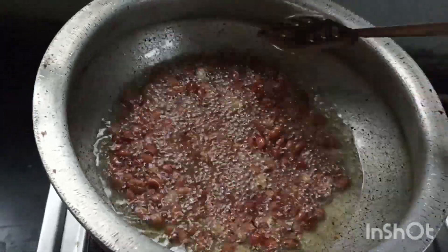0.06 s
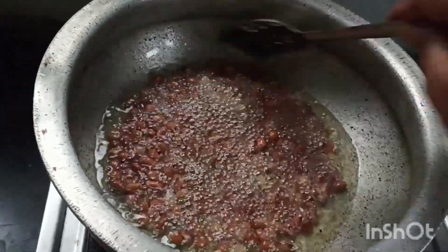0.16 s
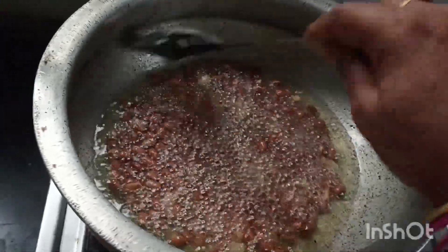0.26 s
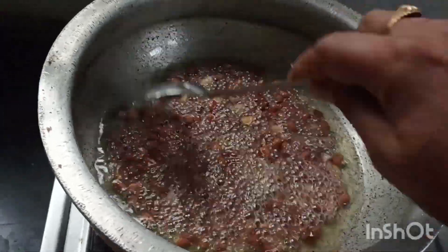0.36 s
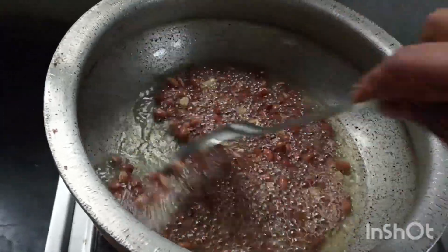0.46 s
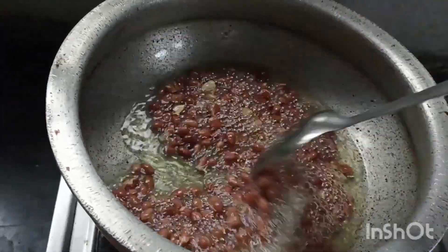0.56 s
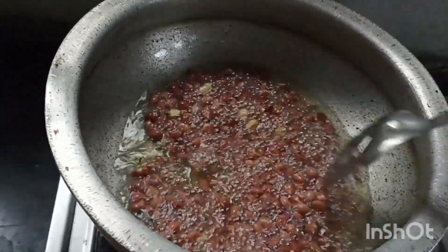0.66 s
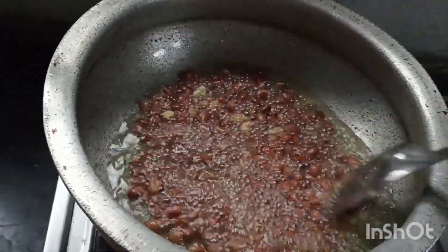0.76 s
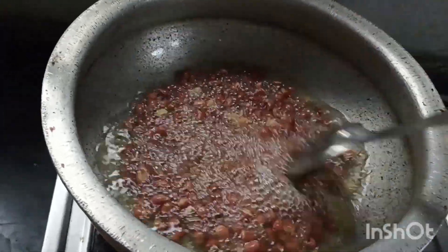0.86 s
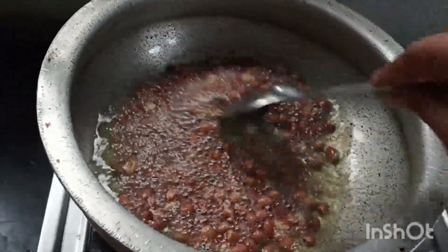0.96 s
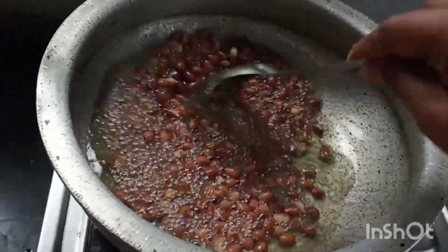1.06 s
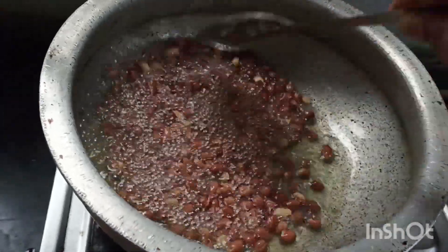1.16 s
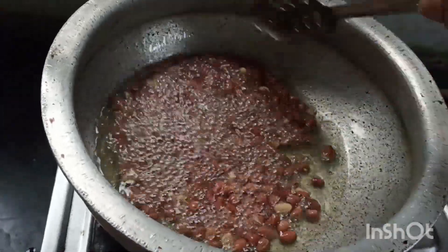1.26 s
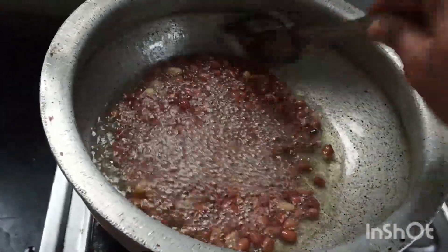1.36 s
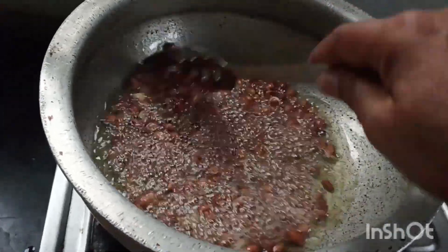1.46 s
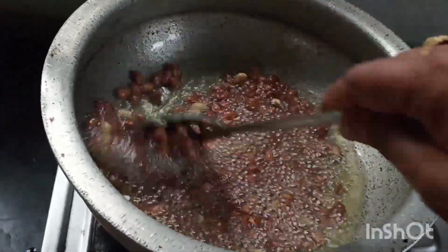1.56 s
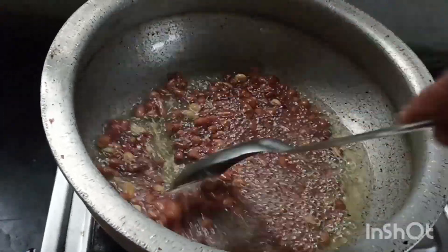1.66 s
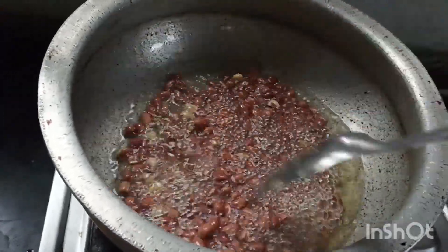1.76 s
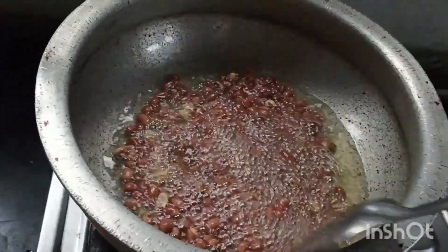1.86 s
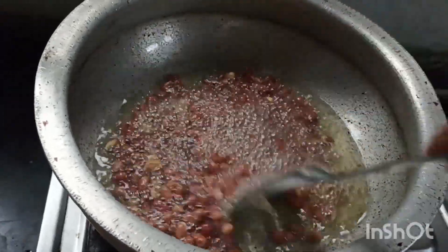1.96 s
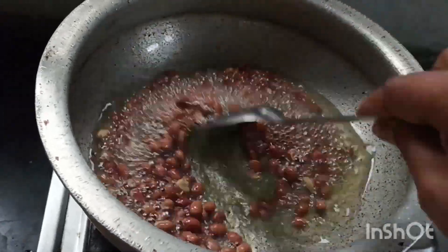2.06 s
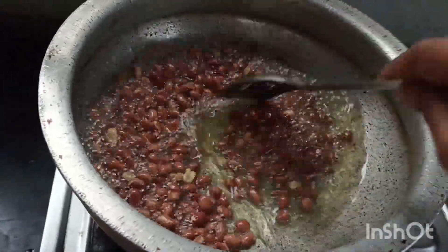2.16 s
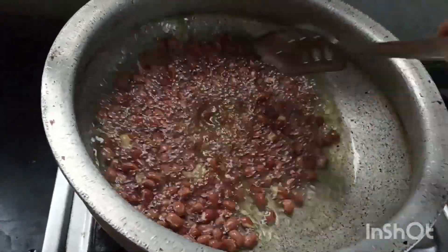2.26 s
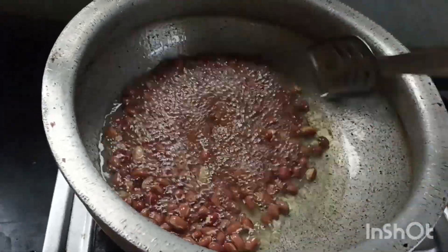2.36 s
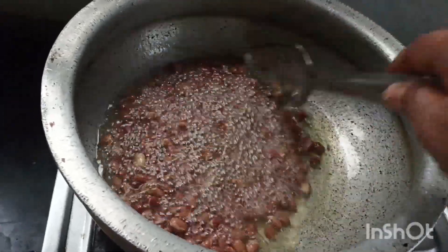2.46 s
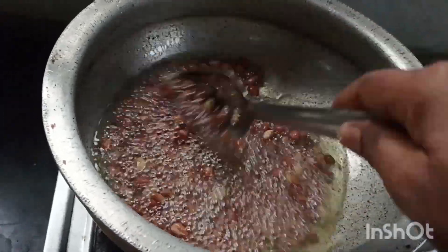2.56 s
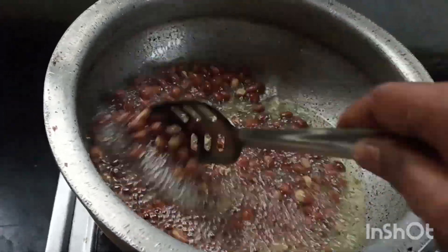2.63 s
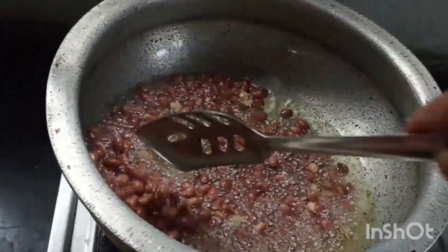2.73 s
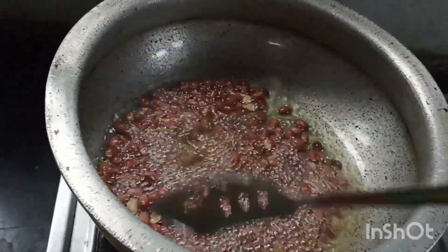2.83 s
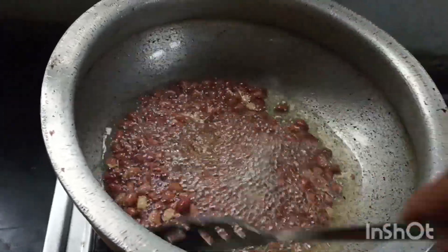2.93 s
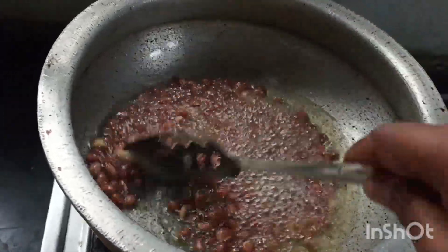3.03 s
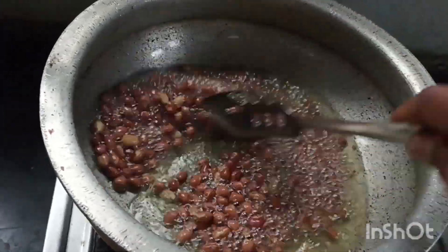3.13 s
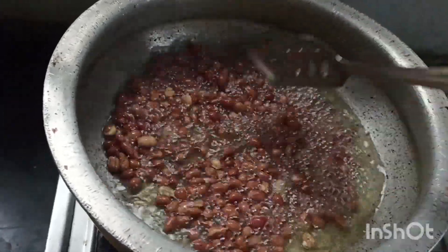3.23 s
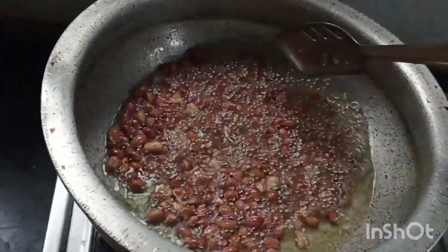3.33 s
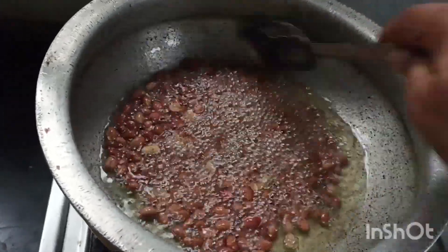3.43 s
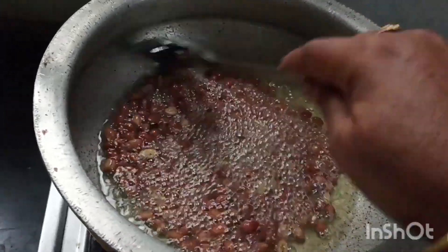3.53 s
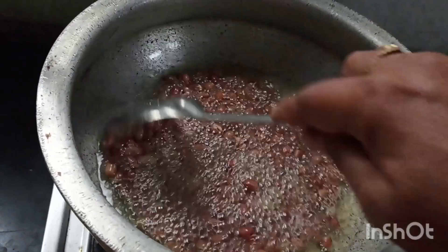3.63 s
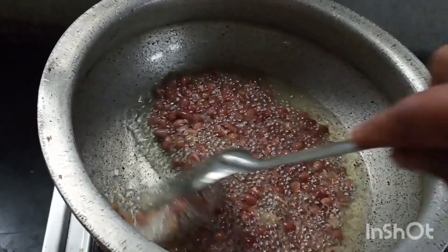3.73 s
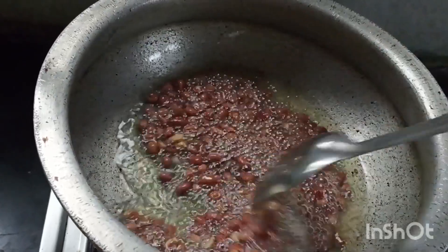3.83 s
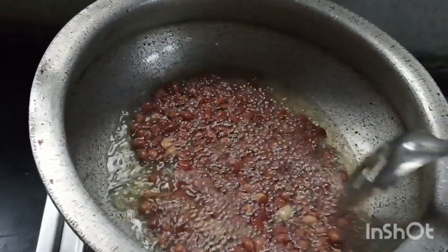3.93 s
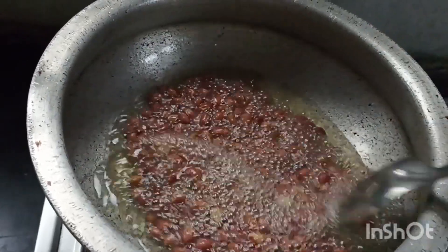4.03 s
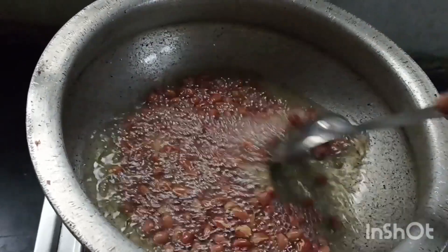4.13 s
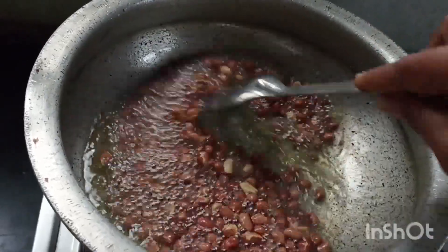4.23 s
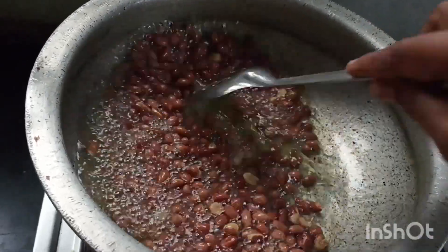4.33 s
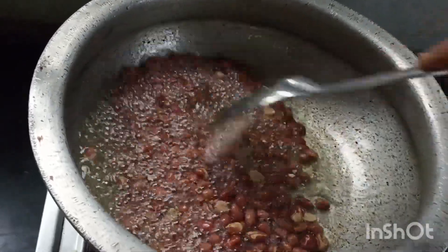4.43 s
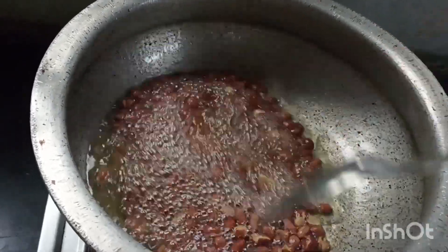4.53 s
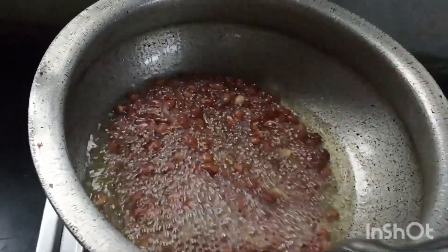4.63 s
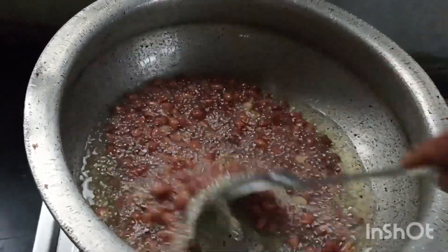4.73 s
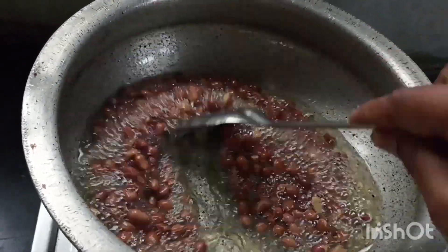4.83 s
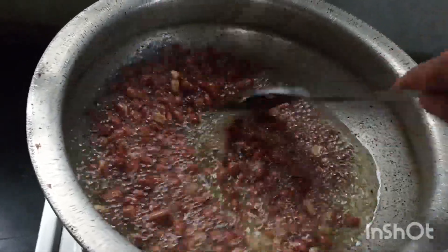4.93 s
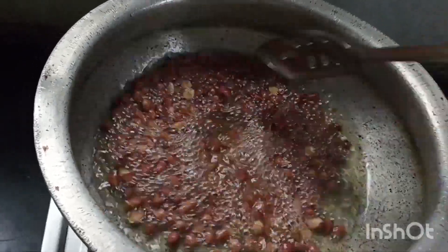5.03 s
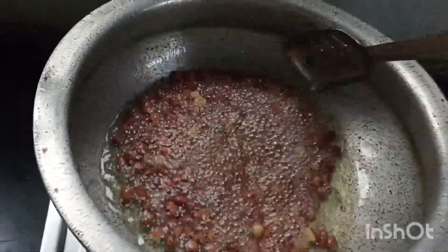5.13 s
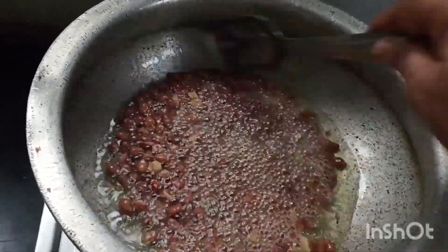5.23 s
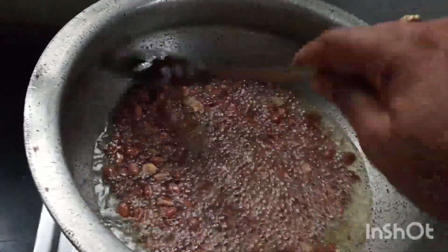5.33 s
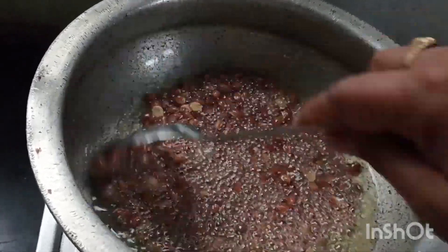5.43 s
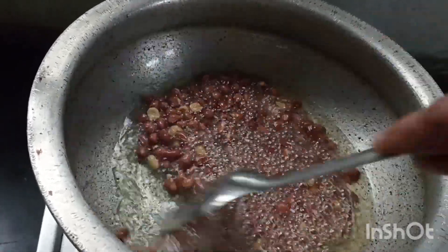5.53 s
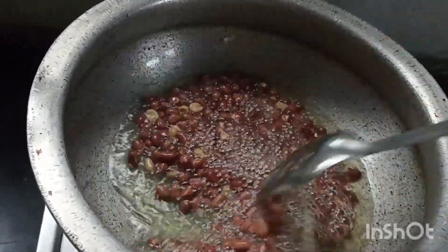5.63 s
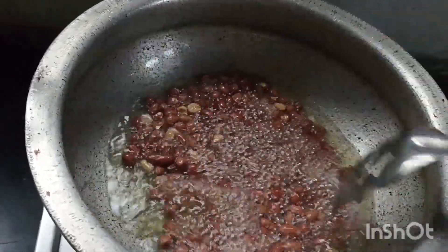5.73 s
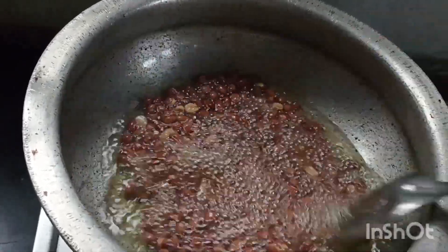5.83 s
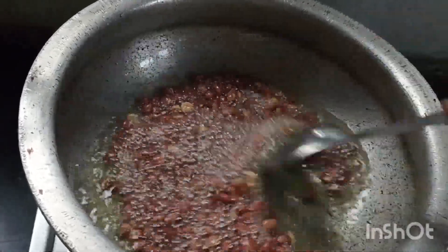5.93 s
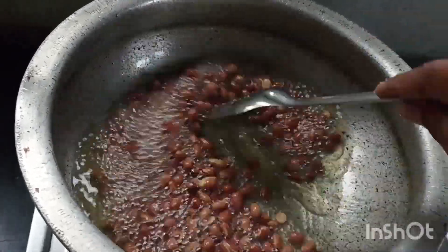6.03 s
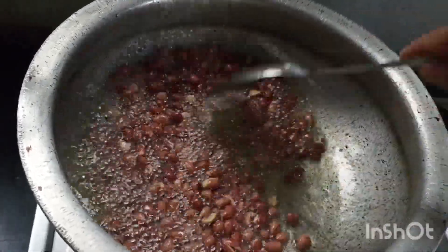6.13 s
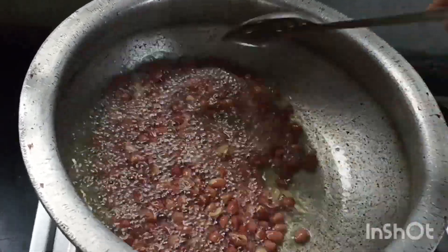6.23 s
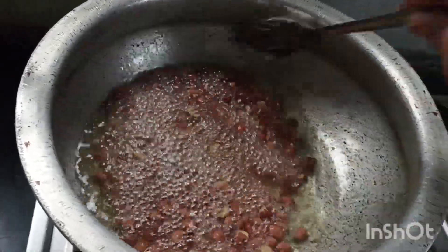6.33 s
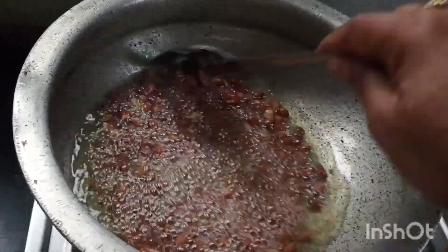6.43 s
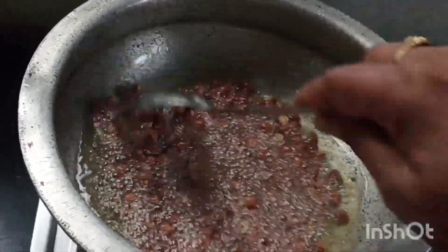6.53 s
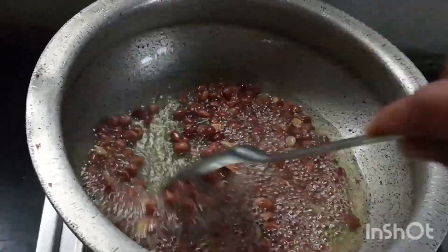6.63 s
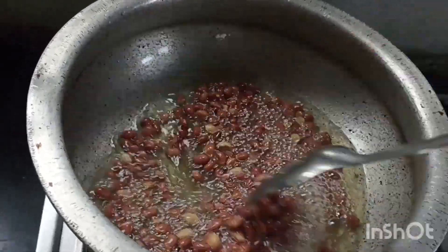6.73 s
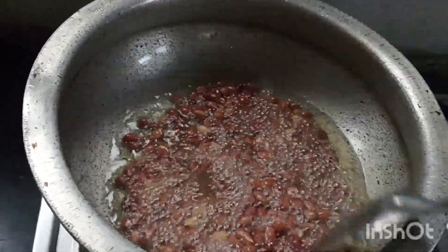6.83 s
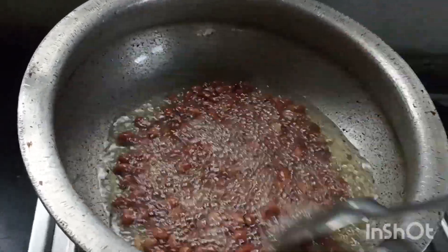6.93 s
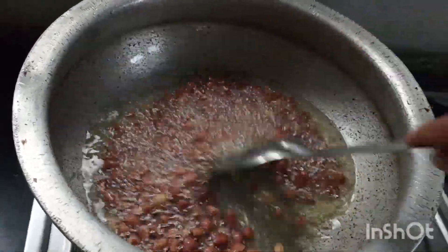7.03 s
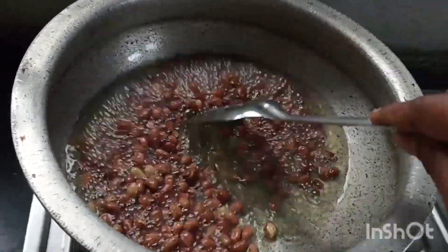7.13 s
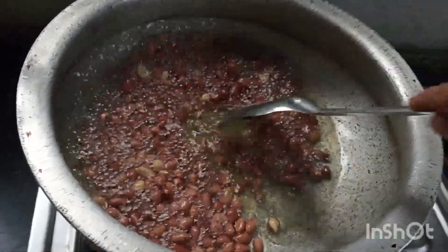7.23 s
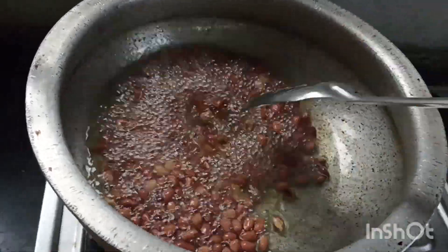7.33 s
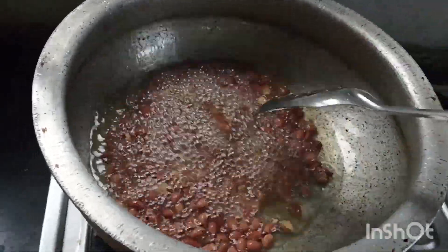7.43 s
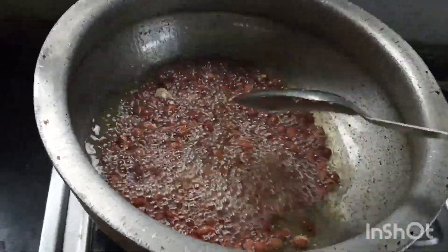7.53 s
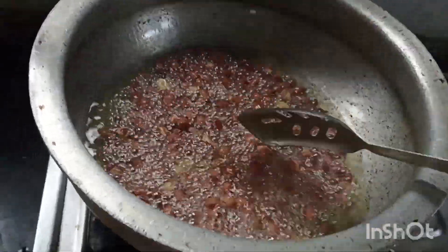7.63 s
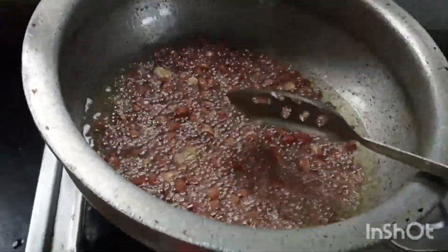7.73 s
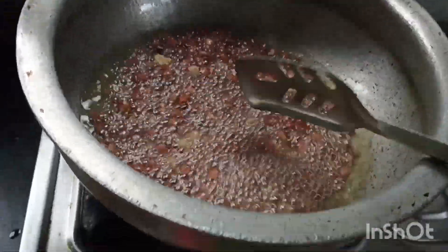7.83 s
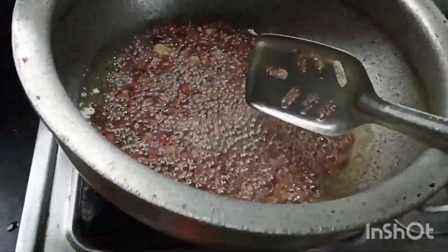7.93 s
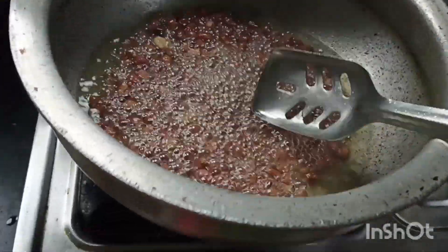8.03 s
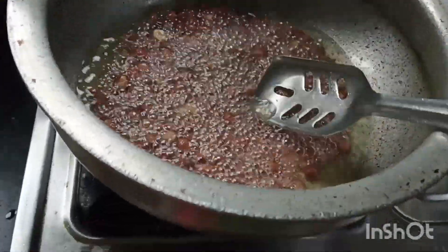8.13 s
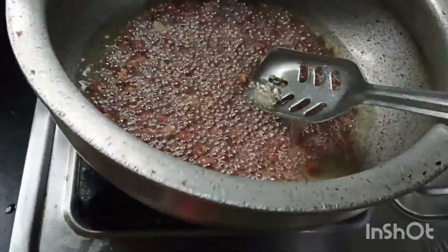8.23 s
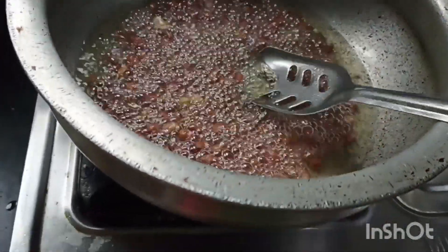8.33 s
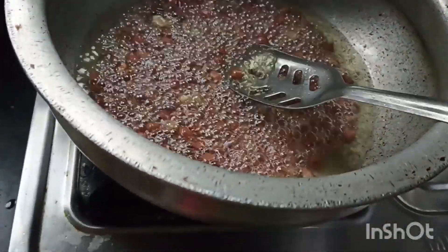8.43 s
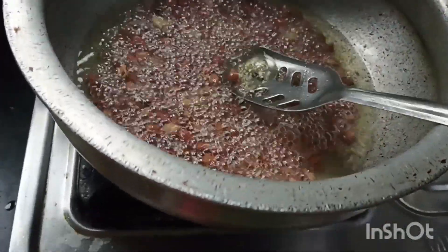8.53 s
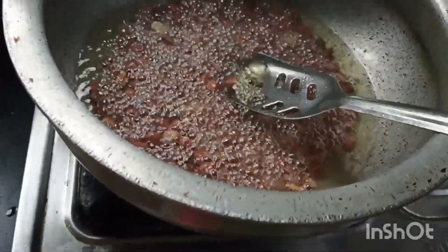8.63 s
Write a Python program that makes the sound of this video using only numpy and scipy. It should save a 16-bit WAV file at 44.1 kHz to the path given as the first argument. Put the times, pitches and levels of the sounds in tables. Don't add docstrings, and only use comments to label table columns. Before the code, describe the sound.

Nuts sizzle and hiss steadily in hot oil while a steel spatula lands, scrapes the metal pan and shoves them in clattering strokes.

```python
import sys
import numpy as np
from scipy import signal
from scipy.fft import rfft, irfft, next_fast_len
from scipy.io import wavfile

SR = 44100
rng = np.random.default_rng(int(sys.argv[2]) if len(sys.argv) > 2 else 0)


def level_to_linear(level):
    exponent = np.asarray(level, float) / 20
    return 10 ** exponent


def int16_out(signal):
    q = np.round(np.clip(np.atleast_2d(signal).T, -1, 1) * 32767)
    wavfile.write(sys.argv[1], SR, q.astype(np.int16))


N = 383213


def unit(x):
    return x / np.sqrt(np.mean(x ** 2) + 1e-20)


def place(out, start_s, sound):
    i = int(start_s * SR)
    out[:, i:i + sound.shape[1]] += sound[:, :N - i]


def at_hz(points, hz):
    point_hz, point_db = np.transpose(points)
    return np.interp(np.log(hz + 1), np.log(point_hz), point_db)


def colour(x, spectrum):
    size = next_fast_len(N)
    gain = level_to_linear(at_hz(spectrum, np.fft.rfftfreq(size, 1 / SR)))
    return unit(irfft(rfft(x, size) * gain, size)[..., :N])


def drift(rate_hz):
    r = np.exp(-2 * np.pi * rate_hz * 40 / SR)
    slow = signal.lfilter([1], [1, -2 * r, r * r], rng.standard_normal(N // 40 + 2002))
    slow = slow[2000:]
    return np.interp(np.arange(N) / 40, np.arange(len(slow)), unit(slow))


def grains(per_s, spread_db):
    sizes = level_to_linear(spread_db * np.minimum(rng.exponential(1, (2, N)), 5))
    signs = rng.choice([-1, 1], (2, N))
    return sizes * signs * (rng.random((2, N)) < per_s / SR)


def ring(clicks, hz, t60):
    r = level_to_linear(-60 / (t60 * SR))
    w = 2 * np.pi * min(hz, .45 * SR) / SR
    return signal.lfilter([0, np.sin(w)], [1, -2 * r * np.cos(w), r * r], clicks + 1e-18)


def body(clicks, modes, wander_db):
    out = 0
    for k, (hz, db, t60) in enumerate(modes):
        wandering = clicks * level_to_linear(wander_db * drift(19.0))
        out = out + (-1) ** k * level_to_linear(db) / np.sqrt(t60) * ring(wandering, hz, t60)
    return unit(out)


def strike(times, levels_db, modes, scatter_db, damp):
    out = np.zeros((2, N))
    at = (np.array(times) * SR).astype(int)
    luck = rng.standard_normal((len(at), len(modes), 2))
    for k, (hz, db, t60) in enumerate(modes):
        clicks = np.zeros((2, N))
        clicks[:, at] = level_to_linear(levels_db + db + scatter_db * luck[:, k].T)
        out += ring(clicks, hz, t60 * damp)
    return out


def puffs(times, levels_db, decay_s, low_hz, high_hz):
    out = np.zeros((2, N))
    t = np.arange(int(.1 * SR)) / SR
    noise = rng.standard_normal((len(times), 2, len(t))) * np.exp(-t / decay_s)
    for s, db, puff in zip(times, levels_db, noise):
        place(out, s, level_to_linear(db) * puff)
    band = signal.butter(2, [low_hz, high_hz], "band", fs=SR, output="sos")
    return signal.sosfilt(band, out + 1e-18)


# (time [s], level [dB])
VIGOUR = [(0.0, -38.5), (0.56, -38.5), (1.28, -38), (1.5, -39), (3.56, -39), (3.87, -39), (4.16, -37.5),
          (7.21, -39), (8.37, -41.5), (8.69, -41)]
# (frequency [Hz], density [dB per Hz])
FIZZ = [(300, -25), (500, -14), (700, -2.5), (1000, -5), (1200, 2.5), (1800, 3), (2400, 1), (3000, 2),
        (3600, 0), (3800, -9), (5000, -17), (7000, -59)]
# (frequency [Hz], density [dB per Hz])
HISS = [(2500, -40), (3800, -8.5), (5000, -9), (6000, -7.5), (6800, -5.5), (7000, -10), (8500, -10),
        (10000, -7), (11200, -2.5), (11700, 1), (13200, -3.5), (15600, -7.5), (16500, -7)]


def oil():
    s, db = np.transpose(VIGOUR)
    vigour_db = np.interp(np.arange(N) / SR, s, db)
    flurry = drift(6.6)
    fizz = colour(grains(9000, spread_db=1.5) * level_to_linear(0.45 * flurry + 1.2 * drift(40)), FIZZ)
    hiss = colour(grains(9000, spread_db=2.0) * level_to_linear(0.46 * flurry + 0.99 * drift(39)), HISS)
    return level_to_linear(vigour_db - 2) * fizz + level_to_linear(vigour_db + 2) * hiss


def crackle():
    pops = grains(30, spread_db=1.6)[0] * np.ones((2, 1))
    bright = ring(pops, 11700, .0012)
    return level_to_linear(-27) * (bright + .4 * ring(pops, 6600, .0015) + .25 * ring(pops, 2300, .003))


# (frequency [Hz], density [dB per Hz])
AIR = [(20, -35), (45, -34), (80, -18), (105, 1.5), (160, -6.5), (250, -3), (350, -0.5), (600, -10.5),
       (900, -35)]


def room_air():
    level_db = -51.5 - 5.0 + 0.67 * drift(0.93)
    return level_to_linear(level_db) * colour(rng.standard_normal((2, N)), AIR)


# (time [s], peak [dB], centre [Hz], left over right [dB])
SPITS = [(0.083, -4, 13300, -11), (0.4694, -22, 2400, -3), (0.7827, -13.5, 11200, 16),
         (1.146, -19, 1790, 14), (1.289, -15, 11900, 13), (1.288, -29, 2400, 0), (1.215, -24.5, 1480, 0),
         (1.5, -22, 1490, 0), (1.857, -30, 1850, 0), (1.891, -22, 1340, -3), (1.927, -21, 1200, 0),
         (2.7338, -10.5, 12600, 8), (2.822, -23, 7300, -1), (3.289, -5, 11150, -10),
         (3.518, -17.5, 8300, -1), (4.467, -6, 11600, -16), (5.548, -26, 1540, 10),
         (5.6789, -5.5, 11800, -5), (5.686, -10, 11700, 5), (6.184, -19, 13600, 8), (6.281, -7, 12600, 13),
         (6.585, -19.5, 4100, 23), (6.7355, -23, 11800, 9.0), (7.282, -17, 1900, -4)]


def spits():
    out = np.zeros((2, N))
    t = np.arange(400) / SR
    noise = rng.standard_normal((len(SPITS), 2, len(t)))
    for (s, db, hz, pan_db), puff in zip(SPITS, noise):
        burst = puff * np.exp(-t / 0.00045)
        pitched = unit(ring(ring(burst, hz, 13.0 / hz), hz, 2.9 / hz))
        crack = unit(np.gradient(burst, axis=1))
        burst = pitched + min(hz / 9000, .5) * crack
        port_db = db + 2.0 + pan_db * np.array([[.2], [-.2]])
        place(out, s, level_to_linear(port_db) * burst / np.abs(burst).max())
    return out


# (time [s], peak [dB], pan against peak [dB], crack against peak [dB], clink against peak [dB])
LANDINGS = [(0.1424, -26, -28, 9, -33), (0.8318, -19, -1.5, -21, -39), (1.3388, -36, 9, 5, -25),
            (1.941, -10, -9, -6, -22), (2.3888, -22, -5, 5, -34), (2.8948, -35.5, -24, 33.5, 7),
            (2.9312, -12, -29, 4, -12.5), (3.4251, -25, 8, 2, -33), (4.0253, -12, -38, 3.5, -20),
            (4.6416, -13, -26, 2.5, -34), (4.6525, -17, -18, -10, -32), (5.1603, -39, -19, 19, -28),
            (5.828, -17, -26, 7.5, -40), (5.8375, -6.5, -11, -7, -26), (6.3447, -28, -29, -6, -26),
            (6.884, -27.5, -25, 12, -5), (6.9209, -8, -21, -5, -43), (7.7331, -29, 0, 12.5, -15)]
# (frequency [Hz], level [dB], t60 [s])
PAN = [(309, -23, 0.33), (410, -3, 0.13), (437, 5, 0.16), (552, -18, 0.15), (592, -10, 0.14),
       (664, 1.5, 0.055), (727, 3, 0.17), (756, 3.5, 0.098), (828, -1.5, 0.2), (1020, -13, 0.043)]
# (frequency [Hz], level [dB], t60 [s])
WALL = [(1217, -7, 0.062), (1250, -7, 0.072), (1553, -10.5, 0.045), (1330, -25.5, 0.15),
        (1790, -13.5, 0.021), (1900, -17, 0.37), (2287, -14, 0.036), (2465, -11.5, 0.019),
        (2945, -11, 0.033), (3253, -11.5, 0.022)]
# (frequency [Hz], level [dB], t60 [s])
BLADE = [(1334, -5, .12), (2293, -2, .08), (3182, -7, .02), (3500, -7, .05), (4237, -13, .06),
         (4590, 3, .06), (5020, -16, .04), (5787, -13, .04), (6150, -12, .06), (6519, -8, .05),
         (6713, -8, .05), (7117, -9, .03), (7768, -7, .07)]
# (frequency [Hz], level [dB], t60 [s])
EDGE = [(9500, -14, .05), (11300, -7, .04), (11630, -2, .05), (12250, -6, .05), (13110, -4, .05),
        (14210, -8, .04), (15050, -11, .04)]


def landings():
    s, db, pan_db, crack_db, clink_db = np.transpose(LANDINGS)
    hit = strike(s, db + pan_db - 18, PAN, scatter_db=3, damp=.4)
    hit += strike(s, db - 15, WALL, scatter_db=4, damp=.6)
    hit += strike(s, db + clink_db + 6, BLADE, scatter_db=1.2, damp=.9)
    hit += strike(s, db + crack_db - 9, EDGE, scatter_db=3, damp=.3)
    thump = puffs(s, db + 5.5, 0.0036, 1500, 3900)
    crack = puffs(s, db + crack_db - 7.5, 0.0045, 3400, 22000)
    return hit + thump + crack


def stove():
    return puffs(np.transpose(LANDINGS)[0], np.full(len(LANDINGS), -28.), 0.08, 67, 153)


def stroke(start_s, slide_s, shove_s, touch_db, meet_db, end_db, release_db_per_s=313):
    touch_s = .002
    steps = [-touch_s, touch_s, slide_s, shove_s, (end_db + 90) / release_db_per_s]
    knots = start_s + np.cumsum(steps)
    return np.interp(np.arange(0, N, 32) / SR, knots, [-90, touch_db, meet_db, end_db, -90])


def every_sample(line):
    return np.interp(np.arange(N) / 32, np.arange(len(line)), line)


# (time [s], length [s], rim rumble [dB], scrape [dB])
SLIDES = [(0.1425, .1, -32, -25), (0.829, .03, -34, -34.5), (1.339, .1, -34.5, -23.5),
          (1.939, .03, -36, -31), (2.388, .08, -30, -23.5), (2.895, .03, -50, -26),
          (3.424, .12, -30.5, -31), (4.025, .03, -51, -35), (4.645, .05, -46, -28), (5.16, .12, -33, -26.5),
          (5.243, .03, -45, -24.5), (5.841, .03, -39, -30.5), (6.345, .1, -34.5, -26.5),
          (6.918, .04, -43, -31.5), (7.732, .02, -42, -41)]
# (time of full load [s], length [s], pan [dB], belly against pan [dB],
# nuts against pan [dB])
SHOVES = [(0.334, 0.093, -27.5, -7, -5), (0.831, 0.15, -25, -7.5, -1), (1.441, .08, -29.5, -7.5, -2),
          (1.957, 0.052, -27, -7.5, 2), (2.026, .03, -28.5, -11, 5.5), (2.48, 0.074, -27.5, -29, 5),
          (2.96, 0.099, -29, -5.5, 0), (3.54, 0.14, -29.5, -4.5, -3.5), (4.033, .18, -22.5, -10.5, -2.5),
          (4.676, 0.061, -25, -3, 0), (4.75, 0.05, -26.5, -3.5, 6.5), (5.364, .12, -25.5, -10.5, -9),
          (5.868, 0.12, -23.5, -12, -2), (6.425, 0.025, -35, -3.5, -3), (6.518, .012, -27.5, -8.5, -1.5),
          (6.937, 0.065, -25.5, -8.5, -1), (7.037, 0.076, -27.5, -12.5, 0.5), (7.736, 0.055, -49, 14, 8),
          (8.396, .05, -58.5, 9, 11)]


def stroke_levels():
    t = np.arange(0, N, 32) / SR
    levels = np.full((5, len(t)), -90.)
    rim, belly, upper, nuts, blade = levels
    for s, length, rim_db, scrape_db in SLIDES:
        rumble = stroke(s, length / 2, length / 2, rim_db, rim_db - 1, rim_db - 2)
        fading = np.where(t < s, -90, scrape_db - 145 * (t - s))
        for row, line in [(rim, rumble), (nuts, rumble), (blade, fading)]:
            np.maximum(row, line, out=row)
    touches = np.transpose(SLIDES)[0]
    for s, length, db, belly_db, nuts_db in SHOVES:
        loading_s = min(0.077, s - touches[touches < s].max())
        start_db = -18.5 * loading_s / 0.077
        # row, level against the pan [dB], change over the shove [dB], release [dB per s]
        for row, rel_db, change_db, release in [(belly, belly_db, -5, 258), (upper, 0, -0.5, 313),
                                                (nuts, nuts_db, 1, 313), (blade, nuts_db - 22.5, 0, 313)]:
            full_db = db + rel_db
            line = stroke(s - loading_s, loading_s, length, full_db + start_db, full_db,
                          full_db + change_db, release)
            np.maximum(row, line, out=row)
    return [every_sample(line) for line in levels]


# (frequency [Hz], density [dB per Hz])
NUTS = [(590, -21.5), (1000, -7.5), (1280, -5), (1690, -11), (1900, -4), (2600, -14.5), (3300, -13),
        (3800, -24.5), (5000, -25.5), (6500, -26), (11000, -120)]
# (frequency [Hz], density [dB per Hz])
GRIT = [(2500, -4), (4000, -3), (6700, 2.5), (8500, -6.5), (11700, 4.5), (13300, 1), (15600, -1.5)]


def stirring():
    rim_db, belly_db, upper_db, nuts_db, blade_db = stroke_levels()
    judder = grains(1500, spread_db=3.0) * level_to_linear(2.5 * drift(90))
    rim = body(judder, PAN[:1], wander_db=-0.5)
    rim += 0.71 * colour(judder, [(180, -31), (260, -9.0), (340, 7.5), (450, 12), (700, -38)])
    belly = body(judder, PAN[1:3], wander_db=2.0)
    belly += 0.62 * colour(judder, [(200, -58), (280, -3.0), (430, 4.0), (650, -40)])
    upper = body(judder, PAN[3:], wander_db=0.5)
    upper += 0.5 * colour(judder, [(400, -28), (550, 2), (1000, -8.0), (1300, -22.0)])
    tumble = grains(800, spread_db=3.5) * level_to_linear(1.2 * drift(50))
    nuts = 0.68 * body(tumble, WALL, wander_db=4.0) + 0.82 * colour(tumble, NUTS)
    grit = grains(9000, spread_db=2.5) * level_to_linear(1.5 * drift(90))
    scrape = .17 * body(grit, BLADE[6:], wander_db=2.5) + .55 * body(grit, EDGE, wander_db=3.0)
    scrape += .7 * colour(grit, GRIT)
    pan = level_to_linear(rim_db - 3.5) * rim + level_to_linear(belly_db + 1.4) * belly + level_to_linear(upper_db - 8.0) * upper
    return pan + level_to_linear(nuts_db - 4.5) * nuts + level_to_linear(blade_db + 2.5) * scrape


# (time [s], peak [dB], pitch [Hz])
TICKS = [(0.32, -17, 745), (0.371, -19, 1260), (0.8925, -8, 1260), (0.931, -14, 1340), (0.9424, -20, 640),
         (0.9686, -7, 1140), (0.9963, -5, 2720), (1.3741, -21, 1980), (1.396, -14, 1560),
         (1.4996, -15, 1480), (1.9906, -11, 3000), (2.004, -11, 1880), (2.024, -16, 1380),
         (2.0437, -13, 1330), (2.0625, -14, 1180), (2.0934, -4, 2740), (2.4531, -18, 3260),
         (2.4682, -18, 1440), (2.497, -15, 1590), (2.5195, -16, 2160), (2.5267, -12, 1950),
         (2.5444, -20, 1430), (2.959, -14, 1290), (2.977, -10, 1300), (3.041, -13, 600), (3.05, -27, 950),
         (3.679, -21, 610), (4.0984, -14, 1320), (4.1085, -16, 1390), (4.1274, -22, 1320), (4.17, -15, 706),
         (4.1774, -27, 710), (4.1911, -19, 1520), (4.2094, -17, 640), (4.681, -15, 610),
         (4.7013, -17, 2220), (4.7255, -12, 1230), (4.7349, -22, 1350), (4.75, -19, 1390),
         (4.7727, -17, 1460), (4.7834, -12, 1370), (4.8025, -11, 2000), (4.8129, -7, 1930),
         (4.834, -4, 1910), (5.438, -18, 790), (5.4841, -26, 720), (5.8939, -26, 686), (5.9106, -4, 3350),
         (5.9264, -12, 1400), (5.94, -8, 1440), (5.9763, -8, 1370), (5.992, -20, 880), (6.5175, -27, 690),
         (6.9498, -20, 640), (6.9642, -21, 2280), (6.9747, -16, 660), (7.0144, -24, 1350),
         (7.0469, -7, 1390), (7.067, -11, 1160), (7.101, -25, 1140)]
# (time [s], peak [dB], frequency [Hz], t60 [s])
PATCHES = [(.143, -23.5, 1386, 0.039), (.145, -32, 3360, .06), (.826, -19, 3000, 0.0091),
           (.832, -15, 1790, 0.038), (.839, -21.5, 610, 0.029), (1.339, -29, 1250, .04),
           (1.341, -37, 4870, 0.045), (1.337, -36, 7040, .03), (4.026, -12.5, 3200, 0.045),
           (4.027, -25, 2260, 0.2), (4.643, -19, 6800, 0.025), (4.644, -20.5, 1250, 0.022),
           (4.6527, -18, 6730, .025), (4.6515, -18, 2900, .02), (4.653, -19, 1190, .025),
           (5.161, -28, 6830, 0.045), (5.16, -29, 1380, 0.033), (5.838, -17, 1750, 0.01),
           (5.838, -17, 3280, 0.069), (5.837, -19, 4440, 0.033), (6.345, -25, 1300, .08),
           (6.347, -26, 3500, 0.077), (6.585, -37, 4250, .02), (6.585, -22, 2480, .015),
           (6.884, -21.5, 3600, 0.092), (6.921, -12, 3320, .02), (7.733, -17, 4050, 0.026),
           (7.734, -23, 3540, 0.082), (8.205, -26, 6000, .004), (8.348, -26, 3500, .03),
           (8.439, -24.5, 2200, .006), (5.359, -24, 762, 0.067), (5.89, -24, 705, .05),
           (.474, -27, 2200, .01), (2.895, -16, 4560, 0.074), (6.884, -20.5, 4600, 0.064)]


def knocks_on_metal():
    out = np.zeros((2, N))
    t = np.arange(4000) / SR
    nut_rows = [(s, db - 8, hz, 11 / hz) for s, db, hz in TICKS]
    rows = nut_rows + PATCHES
    luck = rng.uniform(-1, 1, (len(rows), 2, 3))
    for (s, db, hz, t60), chance in zip(rows, luck):
        detune, phase, snap_pitch = chance[:, :1], chance[:, 1:2], chance[:, 2:]
        pair = np.sin(2 * np.pi * hz * t)
        pair = pair + .5 * np.sin(2 * np.pi * hz * (1 + .04 * detune) * t + phase)
        snap = .35 * np.sin(2 * np.pi * hz * (2.2 + .5 * snap_pitch) * t) * level_to_linear(-120 * t / t60)
        place(out, s, level_to_linear(db - 2 - 60 * t / t60) * (pair + snap))
    return out


# (time [s], length [s], level
# [dB], pitch [Hz])
SINGING = [(.146, 0.18, -33, 1334), (5.175, 0.06, -35, 1334), (5.243, .012, -32, 5020),
           (5.243, 0.04, -34.5, 2480), (5.252, .015, -37, 6620), (5.255, .02, -40, 7600),
           (5.475, 0.017, -31, 2000), (3.55, .02, -38, 4000), (2.395, .05, -36, 2780), (3, .04, -39, 3250),
           (.31, .03, -39, 3200)]


def singing():
    out = np.zeros(N)
    wobble_hz = 6 * drift(26)
    for s, length, db, hz in SINGING:
        line = stroke(s, .7 * length, .3 * length, db, db - 4, db - 8, release_db_per_s=600)
        level_db = every_sample(line) + 2 * drift(40)
        pitch_hz = hz + wobble_hz * hz / BLADE[0][0]
        out += level_to_linear(level_db) * np.sin(2 * np.pi * np.cumsum(pitch_hz) / SR)
    return out * np.ones((2, 1))


# (time [s], peak [dB], centre [Hz])
CLUMPS = [(0.319, -17, 466), (0.35, -21, 727), (0.385, -21, 444), (0.841, -9, 686), (0.869, -13, 1250),
          (0.909, -21, 444), (0.959, -12.5, 795), (0.974, -14, 724), (0.994, -11.5, 1200),
          (1.37, -19, 1470), (1.394, -14.5, 1550), (1.429, -12.5, 734), (1.979, -27, 424),
          (2.01, -18, 1220), (2.043, -7, 625), (2.059, -14, 1230), (2.085, -11.5, 1200), (2.465, -22, 1160),
          (2.524, -27, 1290), (2.974, -17, 468), (3.042, -23, 420), (3.074, -13.5, 717), (3.497, -15, 756),
          (3.607, -14, 541), (3.674, -19, 435), (4.035, -13, 755), (4.088, -14, 440), (4.106, -10, 1330),
          (4.139, -9, 1270), (4.159, -8.5, 665), (4.172, -8.5, 620), (4.214, -10.5, 1090),
          (4.664, -14.5, 1330), (4.684, -29, 434), (4.699, -12.5, 2230), (4.722, -7.5, 720),
          (4.746, -7.5, 1250), (4.775, -8, 1460), (4.783, -7, 1250), (4.802, -25, 1900), (4.811, -17, 1940),
          (4.834, -27, 1830), (5.357, -14, 750), (5.406, -19, 445), (5.434, -13, 990), (5.481, -16, 785),
          (5.888, -28, 740), (5.924, -12, 1230), (5.968, -5.5, 1330), (6.485, -22, 705), (6.498, -14, 740),
          (6.949, -9, 720), (6.977, -13, 406), (7.017, -20, 610), (7.048, -11, 1610), (7.064, -8, 1160),
          (7.1, -10.5, 1230)]


def clumps():
    out = np.zeros((2, N))
    t = np.arange(2000) / SR
    shape = (1 - np.exp(-t / .0006)) * np.exp(-t / .006)
    noise = rng.standard_normal((len(CLUMPS), 2, len(t))) ** 3
    for (s, db, hz), rattle in zip(CLUMPS, noise * shape):
        tone = unit(ring(ring(rattle, hz, 13 / hz), hz, 5.4 / hz))
        upper_hz = 1.9 * hz
        tone = tone + .55 * unit(ring(ring(rattle, upper_hz, 2.5 / hz), upper_hz, 2.5 / hz))
        place(out, s, level_to_linear(db - 6) * tone / np.abs(tone).max())
    return out


# (time [s], peak [dB])
KNOCKS = [(0.415, -32), (0.498, -36), (0.748, -40), (1.055, -35.5), (1.496, -34), (1.6, -38.5),
          (1.828, -33), (2.12, -32), (2.584, -32), (2.866, -40), (3.186, -34.5), (3.659, -37.5),
          (3.813, -37), (4.279, -34.5), (4.92, -39), (5.058, -36.5), (5.42, -34), (5.684, -34),
          (6.245, -39.5), (6.405, -34), (6.673, -37.5), (6.869, -41), (7.326, -37.5), (7.549, -37.5),
          (7.885, -34.5), (8.129, -39), (8.174, -40), (8.253, -40), (8.524, -37.5), (8.559, -47)]
# (frequency [Hz], level [dB], t60 [s])
ROOM_MODES = [(111.4, 0, 0.93), (163.7, 0, 0.74), (209.7, 6, 0.86), (267, -30.5, 0.23), (290, -20, 0.18)]


def next_room():
    s, db = np.transpose(KNOCKS)
    modes = strike(s, db - 20.0, ROOM_MODES, scatter_db=2.5, damp=0.96)
    modes = signal.lfilter([.03], [1, -.97], modes)
    return modes + puffs(s, db + 9.5, 0.059, 146, 380)


def kitchen(x):
    t = np.arange(int(.4 * SR)) / SR
    t60_s, first_echo_s = 0.33, .004
    tail = rng.standard_normal((2, len(t))) * level_to_linear(-60 * t / t60_s) * (t > first_echo_s)
    tail = signal.lfilter([.4], [1, -.6], tail)
    tail /= np.sqrt(np.sum(tail ** 2, axis=1, keepdims=True))
    return signal.fftconvolve(x, tail, axes=1)[:, :N]


def scene():
    no_bass = signal.butter(2, 260, "high", fs=SR, output="sos")
    cracks = signal.sosfilt(no_bass, landings() + spits())
    cracks = signal.sosfilt(signal.butter(6, 15500, fs=SR, output="sos"), cracks)
    slides = signal.sosfilt(no_bass, stirring() + singing() + clumps())
    steady = slides + level_to_linear(-12) * kitchen(slides + .5 * cracks)
    steady += oil() + crackle() + room_air() + next_room() + stove()
    steady += signal.sosfilt(no_bass, knocks_on_metal())
    top = signal.cheby2(16, 70, 16080, fs=SR, output="sos")
    return cracks + signal.sosfilt(top, steady)


# (frequency [Hz], share [0 to 1])
LIKENESS = [(60, 1), (130, 0.86), (290, 1), (640, 0.64), (1400, 0.16), (3100, 0.061), (7000, 0.032),
            (15000, 0.22)]
# (frequency [Hz], left over right [dB])
LEAN = [(60, -5), (140, 3), (330, -1), (500, 1.5), (770, 3.5), (1170, 3.5), (1790, 8.5), (2740, 9),
        (4190, 3.5), (5500, -0.5), (6800, 0), (8000, -5), (10000, 20), (15000, 16)]


def two_ports(dry):
    size = next_fast_len(N)
    hz = np.fft.rfftfreq(size, 1 / SR)
    near, other = rfft(dry, size)
    alike = np.clip(at_hz(LIKENESS, hz), 0, 1)
    lean_db = at_hz(LEAN, hz)
    left, right = level_to_linear(lean_db / 2), level_to_linear(-lean_db / 2)
    late = np.exp(-2j * np.pi * hz * 0.00014)
    centre = np.sqrt(left ** 2 + right ** 2 + 2 * alike * left * right * late.real) / 2
    far = (alike * near + np.sqrt(1 - alike ** 2) * other) * late
    ports = irfft([near * left / centre, far * right / centre], size)[:, :N]
    return .85 * np.tanh(ports / .85)


def band_limit(x):
    return signal.sosfilt(signal.butter(12, 16810, fs=SR, output="sos"), x)


def record(dry):
    mix = two_ports(dry)
    return band_limit(mix)


dry = scene()
out = record(dry)
int16_out(out)
```